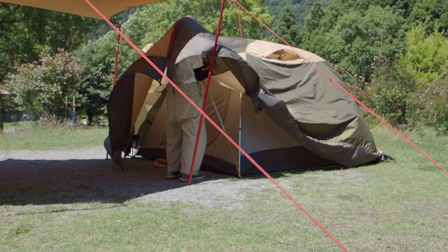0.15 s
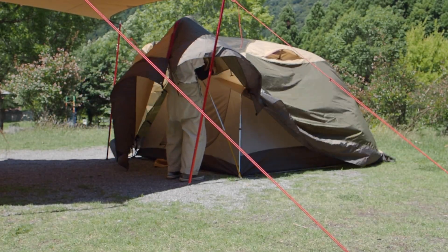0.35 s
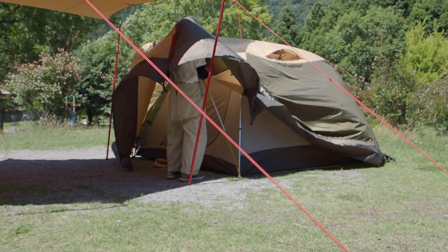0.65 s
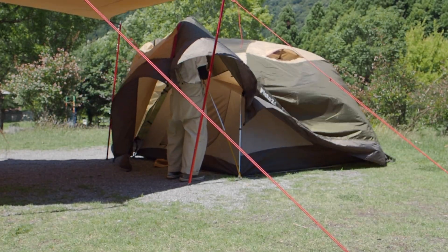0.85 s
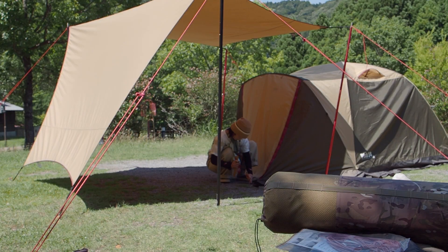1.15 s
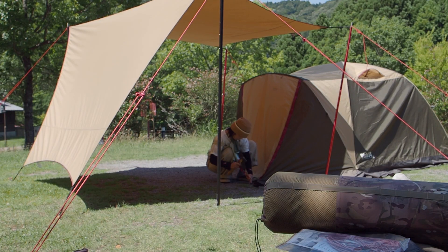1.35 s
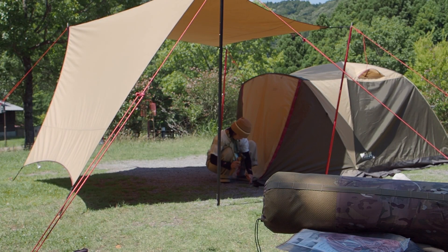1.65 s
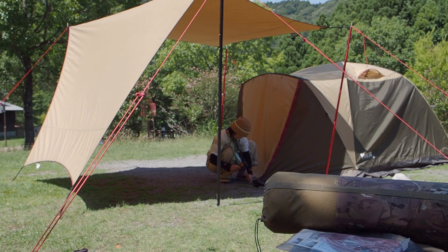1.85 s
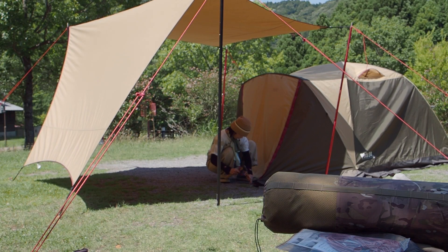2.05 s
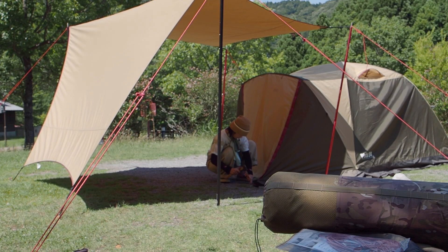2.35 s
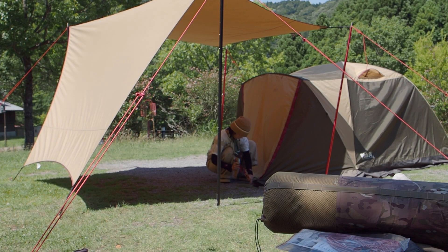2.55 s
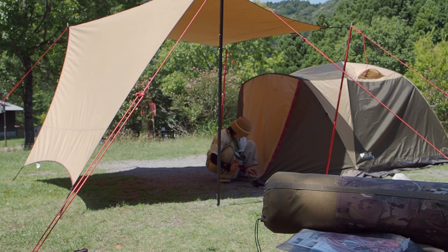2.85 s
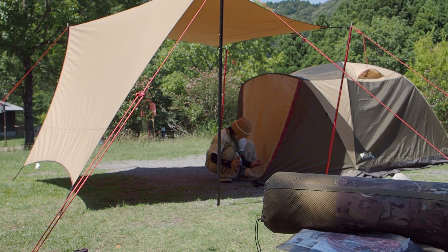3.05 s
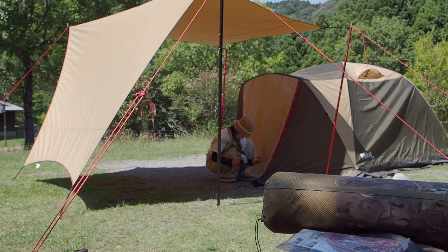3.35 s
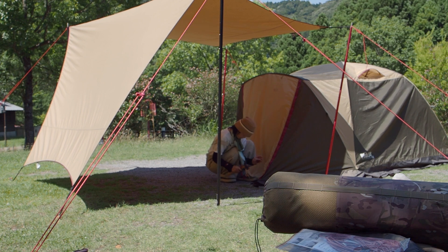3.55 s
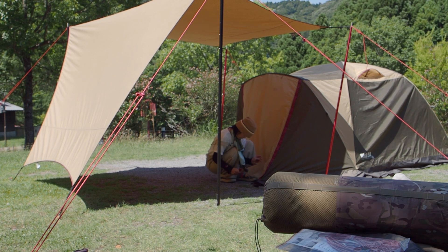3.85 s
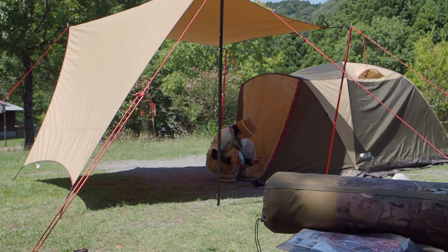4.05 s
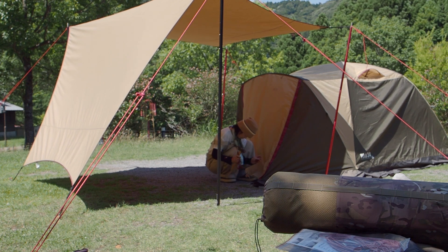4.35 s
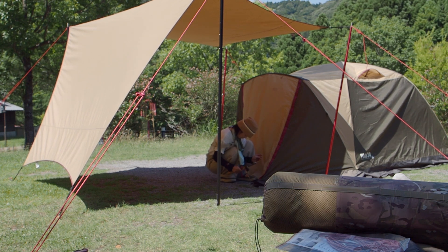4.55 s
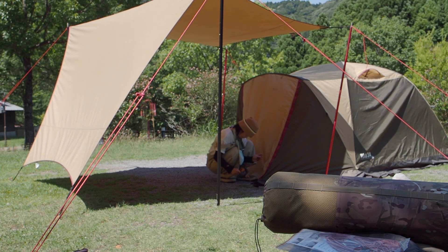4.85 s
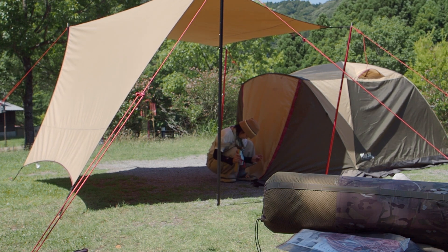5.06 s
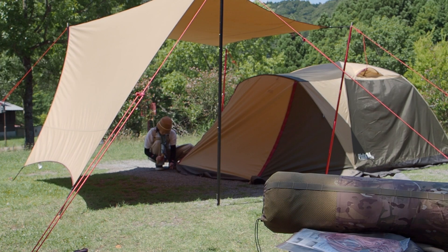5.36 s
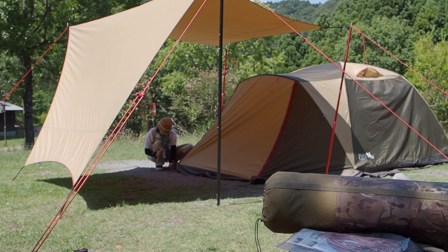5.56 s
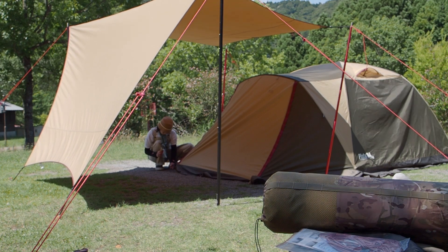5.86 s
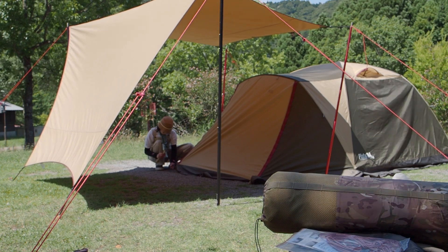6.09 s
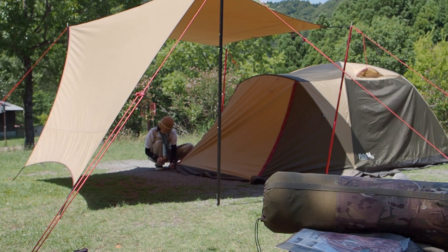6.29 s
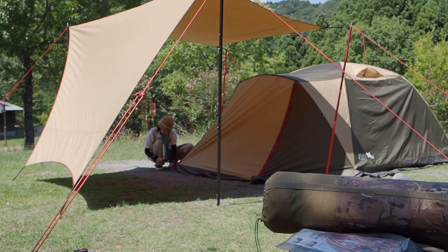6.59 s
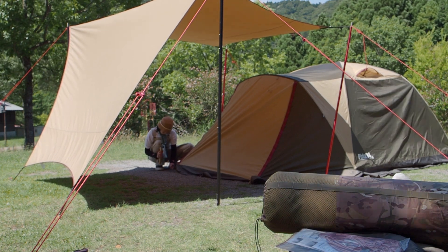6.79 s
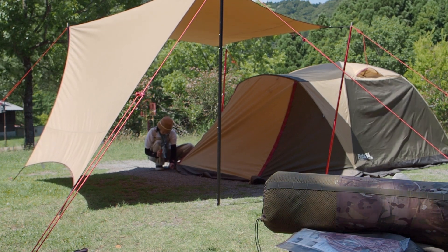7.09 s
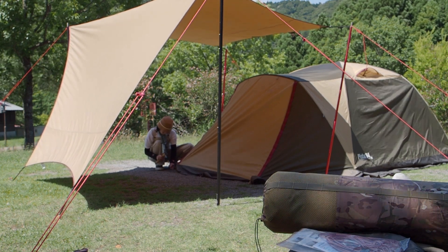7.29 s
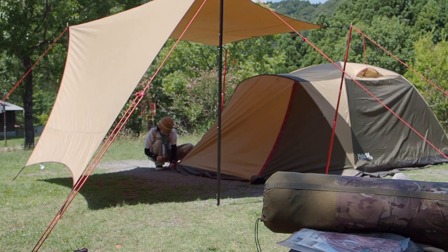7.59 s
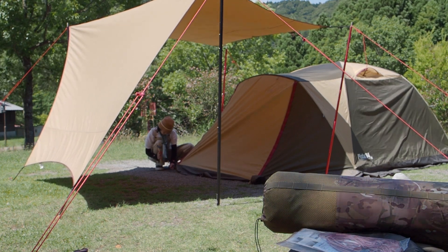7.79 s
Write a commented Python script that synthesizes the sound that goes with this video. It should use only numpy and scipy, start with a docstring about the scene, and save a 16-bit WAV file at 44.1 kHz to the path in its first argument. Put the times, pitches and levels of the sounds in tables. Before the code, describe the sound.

After a second of gusty wind and faint cloth snaps, a hammer strikes tent pegs over three times a second, bright cracks in leafy open air.

```python
"""Open campsite: a steel hammer drives two tent pegs into stony ground, some metres from a camera.
Each blow sums shaped noise (crack, chatter, knock), damped sines (head ring, soil thud), resonant noise
(peg rattle) and decaying noise returned by tent cloth and trees. Leaves and a far rush are patchy noise
over a low drone; cloth snaps in noise bursts, gravel crunches in short tones, wind buffets two ports.
The camera gain drops after loud peaks and creeps back."""
import sys
import numpy as np
from scipy import signal
from scipy.fft import rfft, irfft, next_fast_len
from scipy.io import wavfile
from scipy.ndimage import uniform_filter1d, map_coordinates

SR = 44100
rng = np.random.default_rng(int(sys.argv[2]) if len(sys.argv) > 2 else 0)


def int16_out(signal):
    """Quantize to a 16-bit WAV file."""
    q = np.round(np.clip(np.atleast_2d(signal).T, -1, 1) * 32767)
    wavfile.write(sys.argv[1], SR, q.astype(np.int16))


N = 349713

# Leaf hiss spectrum, also colours the cloth snaps: (frequency [Hz], relative level [dB per Hz])
LEAF_SPECTRUM = [(1470, -12), (2500, -8), (3870, -5.5), (4990, 0.5), (6440, -4.5), (7390, -0.5),
                 (8290, 2.5), (9750, -4.5), (12800, -5.5), (15100, -15.5), (15700, -15), (15900, -60),
                 (16500, -100)]


def amp(db):
    """Gain of a level in dB."""
    return 10 ** (np.asarray(db) / 20)


def unit(x):
    """x at rms 1."""
    return x / np.sqrt(np.mean(x ** 2) + 1e-20)


def along(points, hz):
    """(Hz, value) points interpolated on a log frequency axis."""
    point_hz, value = np.transpose(points)
    return np.interp(np.log(hz + 1), np.log(point_hz + 1), value)


def curves(rows):
    """One value per sample for each column after the time."""
    time_s, *columns = np.transpose(rows)
    return [np.interp(np.arange(N) / SR, time_s, column) for column in columns]


def wobble(knots_per_s):
    """A smooth random curve."""
    knots = rng.standard_normal(N // 200)
    return map_coordinates(knots, [np.arange(N) * knots_per_s / SR])


def filtered(x, response):
    """x times a response of frequency."""
    size = next_fast_len(x.shape[-1] + 8192)
    spectrum = rfft(x, size) * response(np.fft.rfftfreq(size, 1 / SR))
    return irfft(spectrum, size)[..., :x.shape[-1]]


def causal(x, level_db):
    """x through the minimum-phase filter with this level over frequency."""
    cepstrum = irfft(np.log(amp(level_db(np.fft.rfftfreq(4096, 1 / SR)))))
    cepstrum[1:2048] *= 2
    cepstrum[2049:] = 0
    pulse = irfft(np.exp(rfft(cepstrum)))[None, :2048]
    return signal.oaconvolve(x, pulse, axes=1)[:, :x.shape[1]]


def add(track, start_s, sound):
    """Mixes a stereo or mono row sound into the track."""
    part = track[:, round(start_s * SR):][:, :sound.shape[1]]
    part += sound[:, :part.shape[1]]


def left_right(pan_db):
    """Port gains with this left-right level difference."""
    return amp(pan_db / 2 * np.array([[1], [-1]]))


def patches(shape, bins, frames):
    """Random field of rms 1, smoothed over frequency bins and time frames."""
    field = uniform_filter1d(rng.standard_normal(shape), size=bins, axis=0)
    return unit(uniform_filter1d(field, size=frames, axis=1))


def patchy_noise(spectrum, alike, patchy_db):
    """Stereo noise of rms 1 with patches of random gain; mid and side shares set left-right likeness."""
    z = signal.stft(rng.standard_normal((2, N)), nperseg=512)[2]
    z = z * amp(patchy_db * patches(z.shape[1:], bins=6, frames=12))
    pair = signal.istft(z, nperseg=512)[1][:, :N]

    def mid_side(hz):
        angle = np.arccos(np.clip(along(alike, hz), -1, 1)) / 2
        return amp(along(spectrum, hz)) * [np.cos(angle), np.sin(angle)]

    mid, side = filtered(pair, mid_side)
    return unit(np.array([mid + side, mid - side]))


def burst(t, t60_s, spread):
    """A dying puff of noise, the two ports unlike by the share spread."""
    mid, side = rng.standard_normal((2, len(t))) * amp(-60 * t / t60_s)
    return np.array([mid + spread * side, mid - spread * side])


def wind():
    """Eddies thump each port with low noise and short tones; strong ones also flutter higher up."""
    # Wind on the ports: (time [s], level [dB], left-right difference [dB])
    wind_levels = [(0, -58, 10), (.22, -71, 2), (.3, -50.5, 25.5), (.54, -53.5, 9), (.62, -43, 15),
                   (.78, -39, 7), (.96, -44, 9), (.99, -65, -2), (1.3, -58.5, 3), (3.6, -59.5, 1),
                   (5.2, -67.5, 10), (5.5, -55.5, 2), (6.35, -59.5, 6), (6.57, -50, -1), (7.1, -43, -4.5),
                   (7.6, -47, 9), (7.93, -44, -14)]
    # Buffeting spectrum: (frequency [Hz], relative level [dB per Hz])
    buffet = [(12, -49), (20, -20), (74, 1.5), (156, -2), (209, -3), (270, -22), (330, -28), (430, -25),
              (730, -120)]
    # Flutter spectrum: (frequency [Hz], relative level [dB per Hz])
    flutter = [(60, -90), (150, -3), (250, -6.5), (350, 7), (500, -5.5), (700, -14), (1100, -100)]
    # Strongest eddies: (centre time [s], envelope peak [dB], frequency [Hz], port [0 left, 1 right])
    eddies = [(0.5, -36, 126, 0), (0.525, -32, 150, 0), (0.62, -22.5, 176, 0), (0.662, -22, 128, 0),
              (0.682, -15, 170, 0), (0.699, -28, 135, 1), (0.708, -21, 152, 0), (0.843, -15, 181, 0),
              (0.884, -24.5, 148, 0), (0.936, -26.5, 131, 0), (7.076, -24, 109, 1), (7.15, -25.5, 139, 0),
              (7.182, -24.5, 160, 0), (7.228, -26.5, 126, 1), (7.502, -31.5, 130, 1),
              (7.544, -28.5, 125, 0), (7.837, -30, 117, 1), (7.914, -21.5, 162, 0)]
    half_length_cycles = 0.79  # to 1/e
    level_db, pan_db = curves(wind_levels)
    lumps_db = 4.7 * np.array([wobble(25), wobble(25)])
    buffeting = unit(amp(lumps_db) * patchy_noise(buffet, [(100, 0.6)], patchy_db=1.0))
    low = left_right(pan_db) * amp(level_db) * buffeting
    t = np.arange(-2000, 2000) / SR
    for centre_s, peak_db, hz, port in eddies:
        envelope = amp(peak_db) * np.exp(-(t * hz / half_length_cycles) ** 2)
        eddy = envelope * np.cos(2 * np.pi * (hz * t + rng.random()))
        add(low[int(port)][None], centre_s + t[0], eddy[None])
    force = abs(signal.hilbert(low, next_fast_len(N))[:, :N])
    force = uniform_filter1d(force, size=200)
    return low + amp(-4.0) * force ** 1.47 * patchy_noise(flutter, [(300, 0.045)], patchy_db=-0.5)


def air():
    """Leaves hiss over a duller, steady rush from far off, both patchy noise."""
    # Air levels: (time [s], leaves [dB], far rush [dB])
    levels = [(0, -42.5, -45.5), (.95, -43, -46), (.97, -50, -48.5), (2.8, -50, -48.5), (3.15, -48, -46.5),
              (3.6, -49.5, -48.5), (5.2, -49.5, -48.5), (5.3, -41, -46.5), (6.1, -41.5, -48),
              (6.7, -42.5, -48), (7.6, -44.5, -50), (7.93, -44, -48.5)]
    # Far rush spectrum: (frequency [Hz], relative level [dB per Hz])
    rush_spectrum = [(120, -46), (200, -15), (273, -24), (325, -7.5), (419, -5.5), (520, -5), (580, -14.5),
                     (628, -3.5), (904, -2.5), (1030, -4), (1730, -4.5), (1950, -5.5), (5000, -12.5),
                     (6500, -21), (11000, -120)]
    # Leaves: (frequency [Hz], left-right likeness [0-1])
    leaves_alike = [(2500, 0.15), (5000, 0.088), (9000, 0.11), (15000, 0.027)]
    # Far rush: (frequency [Hz], left-right likeness [0-1])
    rush_alike = [(250, 0.33), (600, 0.56), (1500, 0.44), (4000, 0.043)]
    leaves_db, rush_db = curves(levels)
    leaves = amp(leaves_db + 0.32 * wobble(4.3)) * patchy_noise(LEAF_SPECTRUM, leaves_alike, patchy_db=1.2)
    far_rush = amp(rush_db + 0.84 * wobble(3.9)) * patchy_noise(rush_spectrum, rush_alike, patchy_db=0.6)
    return leaves + far_rush


def rumble():
    """A low drone from far off: noise with a slight level wobble."""
    # Drone spectrum: (frequency [Hz], relative level [dB per Hz])
    drone = [(12, -43), (20, -10), (32, -19), (70, -6), (113, -5), (136, -0.5), (262, -11.5), (300, -8),
             (390, -32), (660, -120)]
    return amp(-62.5 + 1.8 * wobble(6.5)) * patchy_noise(drone, [(100, 0.61)], patchy_db=1.0)


def creases():
    """The fly sheet snaps faintly as it is pulled over the poles: leaf-coloured noise bursts."""
    # Cloth snaps: (time [s], level before colouring [dB])
    snaps = [(0.2246, -31), (0.237, -33), (0.243, -29), (0.2523, -28), (0.263, -29.5), (0.3365, -31.5)]
    out, t = np.zeros((2, N)), np.arange(900) / SR
    for start_s, level_db in snaps:
        add(out, start_s, amp(level_db) * burst(t, t60_s=0.018, spread=.7))
    return causal(out, lambda hz: along(LEAF_SPECTRUM, hz))


def contact_crack(t, t60_s, edge_db, click):
    """Steel on steel: a noise burst, click on its first sample, edge_db of gain at the top of the band."""
    snap = burst(t, t60_s, spread=0.16) + click * (t == 0)
    snap *= 1.12 * np.sqrt(t60_s * SR / 14) / np.linalg.norm(snap[0])
    return snap - (amp(edge_db) - 1) * np.diff(snap, n=2, prepend=0, append=0) / 4


def trees(count, patchy_db):
    """A fresh, patchy diffuse answer in which each frequency dies at its own speed."""
    # Decay of the answer: (frequency [Hz], t60 [s])
    decay = [(300, 0.071), (1400, 0.25), (3700, 0.074), (9000, 0.32), (16000, 0.21)]
    hz, t, z = signal.stft(rng.standard_normal((2, count)), SR, nperseg=128)
    patch_db = patchy_db * patches(z.shape[1:], bins=3, frames=14)
    z = z * amp(patch_db - 60 * t / along(decay, hz)[:, None])
    mid, side = signal.istft(z, SR, nperseg=128)[1][:, :count]
    return np.array([mid + 0.97 * side, mid - 1.09 * side])


def head_ring(t, low_db, high_db, split_hz):
    """Modes of the hammer head as decaying sines; low_db sets those below split_hz, high_db the rest."""
    # Head modes: frequency [Hz]
    modes_hz = [3951, 3990, 9797, 14642]
    # Same modes: (relative level [dB], t60 [s])
    modes = [(-3, .4), (-3, .1), (4, .27), (-9, .12)]
    steel = np.zeros(len(t))
    for hz, (mode_db, t60_s) in zip(modes_hz, modes):
        level_db = mode_db + (low_db if hz < split_hz else high_db)
        envelope = amp(level_db - 60 * t / t60_s) * (1 - np.exp(-t / 0.0003))
        steel += envelope * np.sin(2 * np.pi * (hz * t + rng.random()))
    # the ring's level wobbles slowly at random
    return steel * amp(2.5 * np.interp(t, np.arange(40) / 100, rng.standard_normal(40)))


def peg_rattle(t, hz, t60_s, q):
    """Noise ringing in one resonance: a peg rattling in stony soil."""
    x = signal.lfilter(*signal.iirpeak(hz, q, SR), rng.standard_normal((2, len(t))))
    return unit(x + 0.12 * x[::-1]) * amp(-60 * t / t60_s)


def soil_thud(t):
    """The soil gives way: a damped low sine with a soft onset, peak 1."""
    thud = np.sin(2 * np.pi * 185 * t) * amp(-60 * t / 0.032) * (1 - np.exp(-t / 0.0077))
    return np.array([thud, thud]) / thud.max()


def ports_db(hz):
    """Peaks and dips that the microphone housing gives a sound from the front."""
    # Housing colour: (centre [Hz], Gaussian width [Hz], level [dB])
    housing = [(5080, 500, -0.5), (6450, 946, -10), (7200, 640, 1.5), (597, 78, -11), (248, 21, 7.5)]
    return sum(db * np.exp(-((hz - centre_hz) / width_hz) ** 2) for centre_hz, width_hz, db in housing)


def hammer():
    """Crack, chatter, ring, rattle and thud of each blow, with echoes off the cloth and scatter from around."""
    # Blows, levels before colouring: (time [s], crack [dB], knock [dB], low head ring [dB],
    # high head ring [dB], peg rattle [dB], rattle frequency [Hz], edge [dB]: a squarer hit is brighter)
    blows = [(1.0272, -6, -16, -37, -45, -30, 4680, 0), (1.299, -5, -17.5, -39, -36, -27.5, 4840, -20),
             (1.5615, -8, -16, -45, -44, -28.5, 4830, -0.5), (1.8343, -6.5, -17.5, -42, -39, -28, 4970, -3),
             (2.1024, -7, -14.5, -46, -40, -27.5, 4900, -8.5),
             (2.3857, -6.5, -16, -33, -47, -28.5, 5100, 3), (2.6593, -7, -14.5, -41, -50, -32, 4950, -0.5),
             (2.9476, -4, -10.5, -34, -58, -31.5, 5000, -27), (3.2414, -10, -16, -34.5, -43, -28, 5330, 5),
             (3.5492, -2, -13.5, -40, -51, -32.5, 4900, -14),
             (3.8816, -4.5, -13, -27.5, -32, -26, 4680, -20), (4.22, -3, -15.5, -38, -35, -31, 4650, -14),
             (4.5587, -1.5, -17.5, -39.5, -44, -30, 4840, -23),
             (4.8962, 0, -17, -36, -46, -29.5, 4500, -15),
             (5.2318, -2.5, -15, -45.5, -45, -29.5, 4830, -5.5),
             (5.4281, -6, -22.5, -52, -51, -28, 5160, 10.5), (5.737, -2.5, -18.5, -41, -41, -34, 4900, 3),
             (6.0428, -7.5, -20, -58, -49, -23, 5150, 12.5), (6.3386, -6.5, -18, -52.5, -50, -25, 5100, 12),
             (6.6433, 1, -18.5, -54, -45, -32, 5000, 1.5), (6.9451, 2.5, -23.5, -58, -47, -28, 4880, 0),
             (7.2572, -2.3, -18, -45.5, -51, -24, 4980, 3),
             (7.5725, -5, -23.5, -52.5, -45, -29.5, 4640, 12), (7.904, -1.5, -18.5, -52, -46, -23, 4700, 5)]
    # Shared by each peg's blows: (thud [dB], chatter [dB], trees [dB], cloth [dB], rattle t60 [s],
    # rattle sharpness [Q], left-right difference [dB])
    pegs = [(-38.5, -16, -20, -3, .26, 6.6, 0.1), (-41, -9, -24, 0.5, 0.15, 23, -0.5)]
    # First contact at each peg: t60 [s]
    contact_t60_s = [.009, .002]
    # Tent cloth echoes, one list a peg: (delay [s], relative level [dB])
    cloth = [
        [(.0143, -13), (.033, -24)],
        [(.0046, -10), (.0105, -16), (.0197, -16), (.029, -26)],
    ]
    # Crack colour: (frequency [Hz], level [dB])
    crack_colour = [(300, -34), (1500, -11.5), (3000, -10.5), (5000, 0.5), (9000, 2), (13000, -7),
                    (15600, 4), (16000, -11), (17000, -25)]
    # Knock colour: (frequency [Hz], level [dB])
    knock_colour = [(200, -8), (500, 4), (1000, 9), (2000, 5.5), (3000, -5), (6000, -9)]
    # Colour of chatter, cloth and trees: (frequency [Hz], level [dB])
    scatter_colour = [(300, -21), (1500, -20), (4000, -6), (9000, -4), (10500, -13), (13000, -9.5),
                      (15600, -9.5), (15900, -32), (16500, -98)]
    # Added colour once the second peg is struck: (frequency [Hz], level [dB])
    second_colour = [(300, -3.5), (1200, -4), (2200, 5.5), (3300, -1), (5000, 1.5), (8500, 2), (12000, 3),
                     (16000, -6.5)]
    second_peg_s, left_lag_s = 5.33, 29e-6  # the left port hears the first peg later
    vary_db = 1  # blow to blow, of the shared levels
    crack, knock, scatter, uncoloured = np.zeros((4, 2, N))
    t = np.arange(round(.27 * SR)) / SR
    for start_s, crack_db, knock_db, low_db, high_db, rattle_db, rattle_hz, edge_db in blows:
        peg = int(start_s > second_peg_s)
        *shared_db, rattle_t60_s, rattle_q, pan_db = pegs[peg]
        thud_db, chatter_db, trees_db, echo_db = shared_db + vary_db * rng.standard_normal(4)
        sides = left_right(pan_db)

        snap = contact_crack(t, contact_t60_s[peg], edge_db, click=2.4 * peg)
        add(crack, start_s, sides * amp(crack_db) * snap)
        # the head grazes the peg just before it lands
        add(crack, start_s - .002, sides * amp(crack_db - 31) * burst(t[:400], 0.0026, 0.26))

        add(scatter, start_s, sides * amp(chatter_db) * burst(t, 0.024, 0.082))
        for delay_s, cloth_db in cloth[peg]:
            add(scatter, start_s + delay_s, sides * amp(echo_db + cloth_db) * burst(t[:800], 0.011, 0.34))
        add(scatter, start_s, sides * amp(trees_db) * trees(count=len(t), patchy_db=2.5))

        knocking = burst(t, 0.0095, 0.043) + amp(-12.0) * burst(t, 0.068, 0.074)
        add(knock, start_s, sides * amp(knock_db) * knocking)

        rattle = amp(rattle_db) * peg_rattle(t, rattle_hz, rattle_t60_s, rattle_q)
        add(uncoloured, start_s, sides * (head_ring(t, low_db, high_db, rattle_hz) + rattle))
        add(uncoloured, start_s + 0.00093, amp(thud_db) * soil_thud(t))

    mix = uncoloured
    for layer, colour in (crack, crack_colour), (knock, knock_colour), (scatter, scatter_colour):
        mix = mix + causal(layer, lambda hz: along(colour, hz))
    mix = causal(mix, ports_db)
    late_left = filtered(mix[0], lambda hz: np.exp(-2j * np.pi * hz * left_lag_s))
    move = round(second_peg_s * SR)
    mix[0, :move] = late_left[:move]
    mix[:, move:] = causal(mix[:, move:], lambda hz: along(second_colour, hz))
    return mix


def gravel():
    """Stones under a shifting foot knock as short damped tones over a dense scrape of small random grains."""
    # Loudest stones: (time [s], level before onset shaping [dB], frequency [Hz])
    stones = [(3.072, -17.5, 1270), (3.111, -23, 1500), (3.142, -24, 2600), (3.154, -17.5, 1570),
              (3.168, -11.5, 1770), (3.177, -15.5, 1840), (3.195, -19, 1500), (3.222, -17, 1560),
              (4.8, -27.5, 1720)]
    start_s, end_s, scrape_db = 3.15, 3.235, -40.5  # the foot drags from, to
    rise_db_per_s, fall_db_per_s = 120, 720  # before and after the drag
    out, t = np.zeros((2, N)), np.arange(400) / SR
    when, size, pitch = rng.random((1200, 3)).T
    when_s = start_s - .15 + when * (end_s - start_s + .2)
    level_db = scrape_db - rise_db_per_s * np.maximum(start_s - when_s, 0)
    level_db -= fall_db_per_s * np.maximum(when_s - end_s, 0)
    grains = np.transpose([when_s, level_db - 2.1 * np.log(size), 850 * 3.6 ** pitch])
    at_s, db, hz = np.vstack([stones, grains]).T[..., None]
    envelopes = amp(db - 60 * t * hz / 12) * (1 - np.exp(-t * hz * 1.64))  # t60 of 12 cycles
    knocks = envelopes * np.sin(2 * np.pi * hz * t)
    for knock_s, knock, pan_db in zip(at_s[:, 0], knocks, rng.standard_normal(len(at_s))):
        add(out, knock_s, knock * left_right(2 * pan_db))
    return out


def scene():
    """All sources together."""
    return wind() + air() + rumble() + creases() + hammer() + gravel()


def record(dry):
    """The camera turns its gain down after loud peaks, clips near full scale and cuts above its band limit."""
    threshold_db, share = -9, 0.48  # gain drops by this share of the excess
    recovery_db_per_s, delay_s = 18.1, 0.0052
    top_hz, ceiling = 17050, .97
    t = np.arange(N) / SR
    peak_db = 20 * np.log10(np.clip(abs(dry).max(axis=0), 1e-6, 1))
    over_db = np.maximum(peak_db - threshold_db, 0)
    recovery_db = recovery_db_per_s * t
    down_db = np.maximum.accumulate(share * over_db + recovery_db) - recovery_db
    down_db = uniform_filter1d(np.interp(t - delay_s, t, down_db), size=128)
    clipped = np.clip(dry * amp(-down_db), -ceiling, ceiling)
    return np.clip(filtered(clipped, lambda hz: hz < top_hz), -1, 1)


dry = scene()
out = record(dry)
int16_out(out)
```